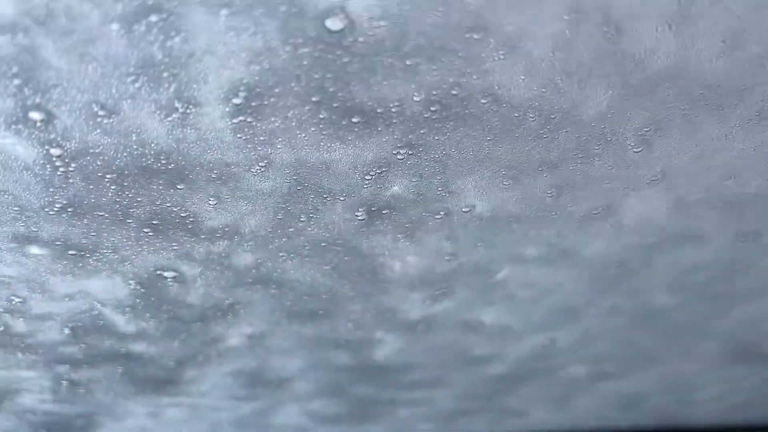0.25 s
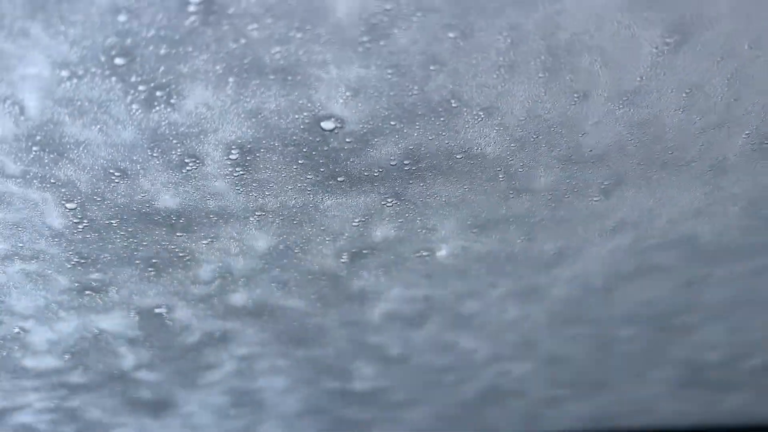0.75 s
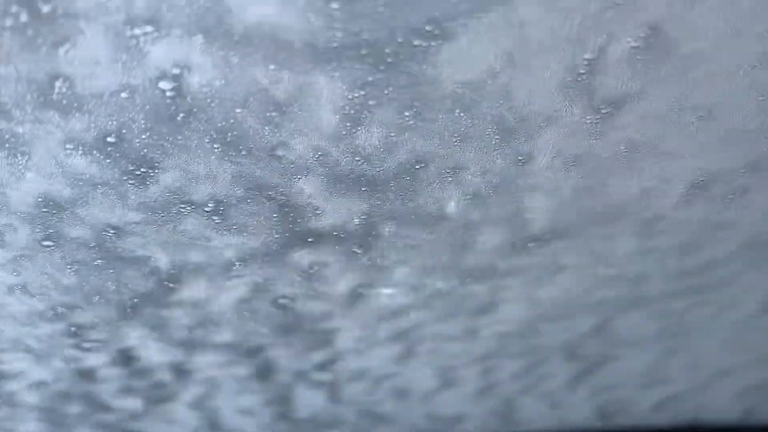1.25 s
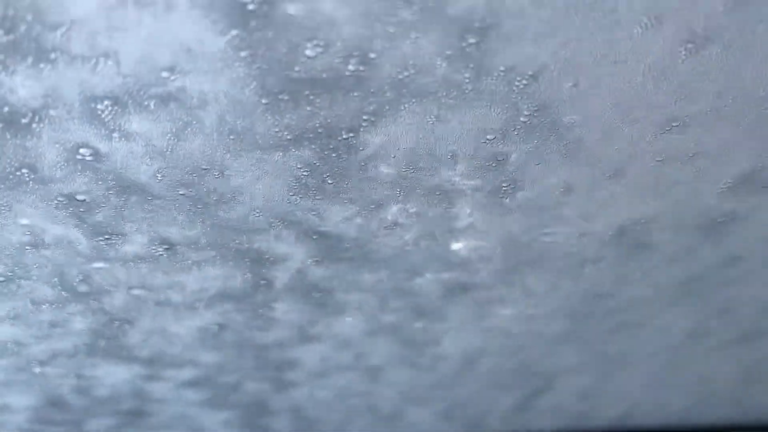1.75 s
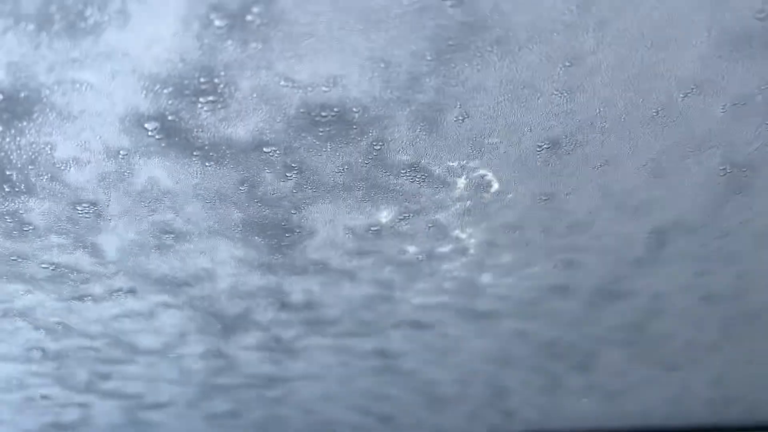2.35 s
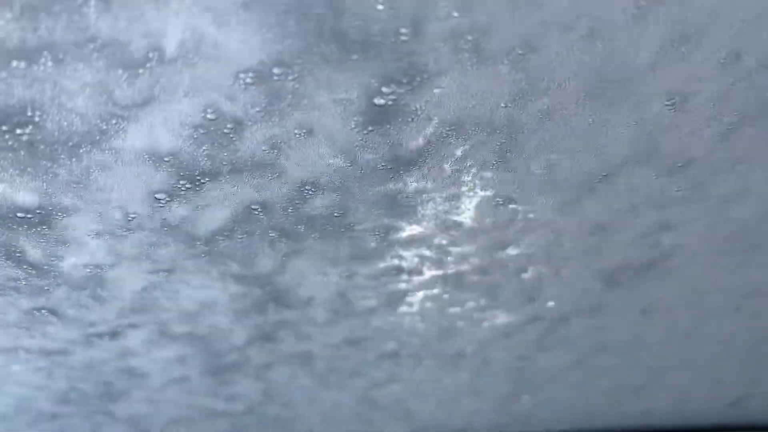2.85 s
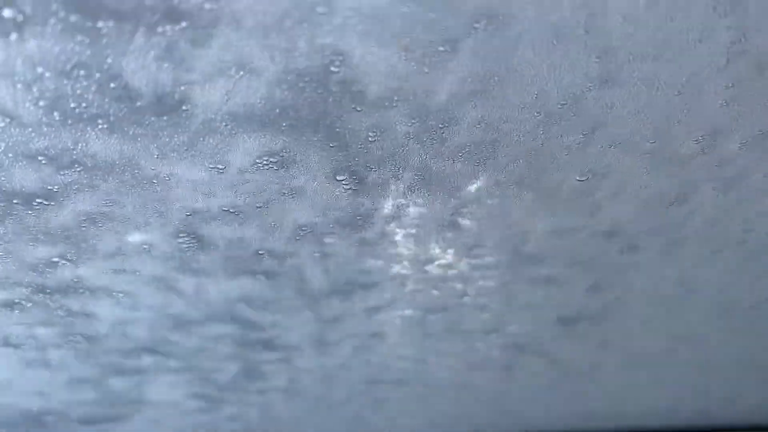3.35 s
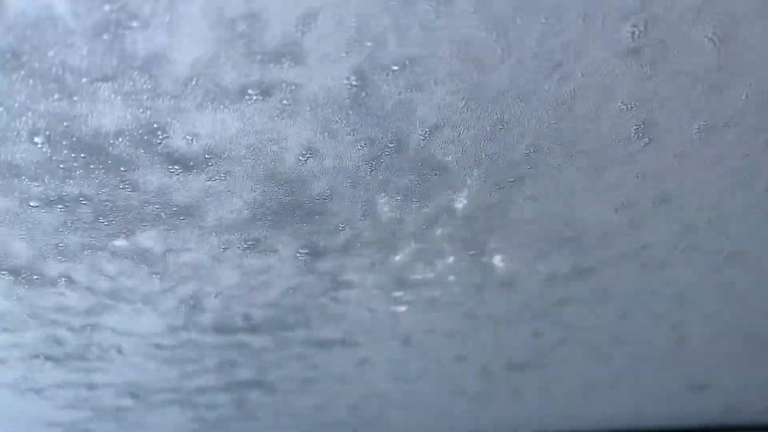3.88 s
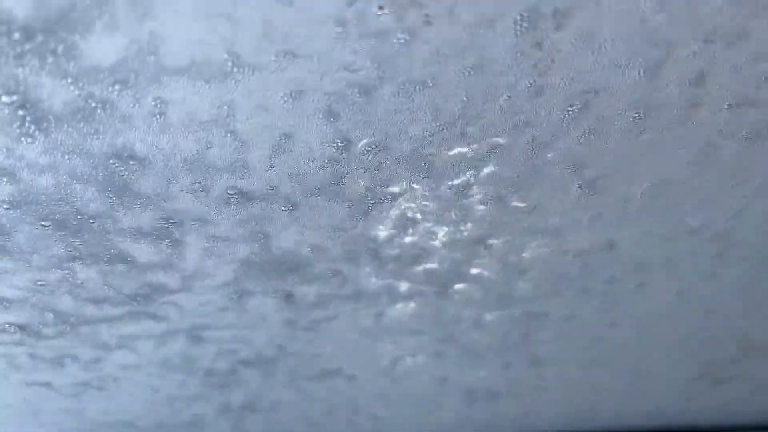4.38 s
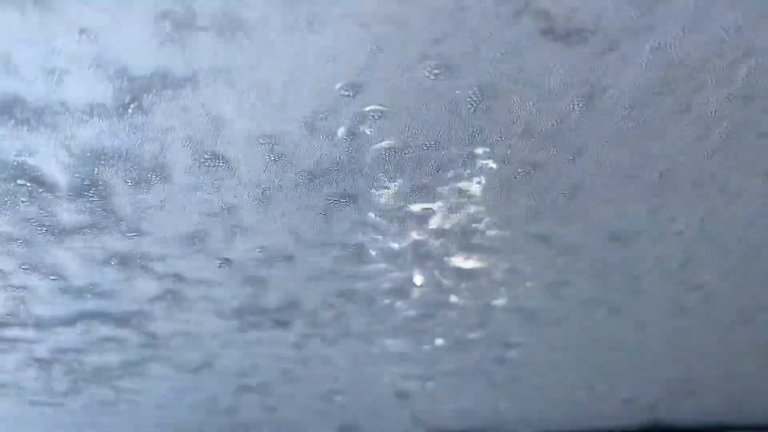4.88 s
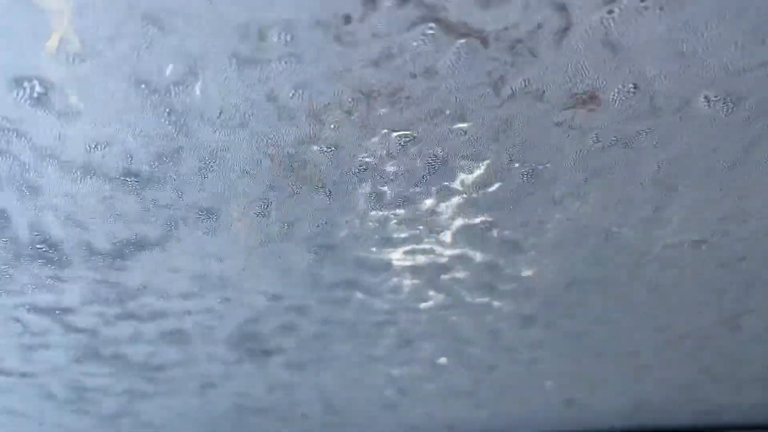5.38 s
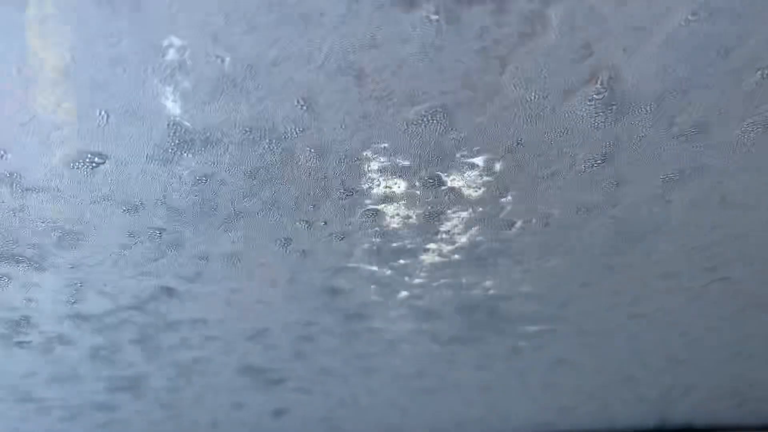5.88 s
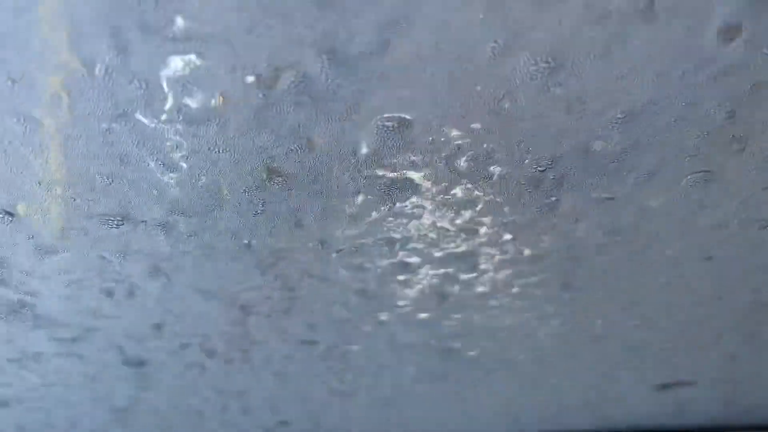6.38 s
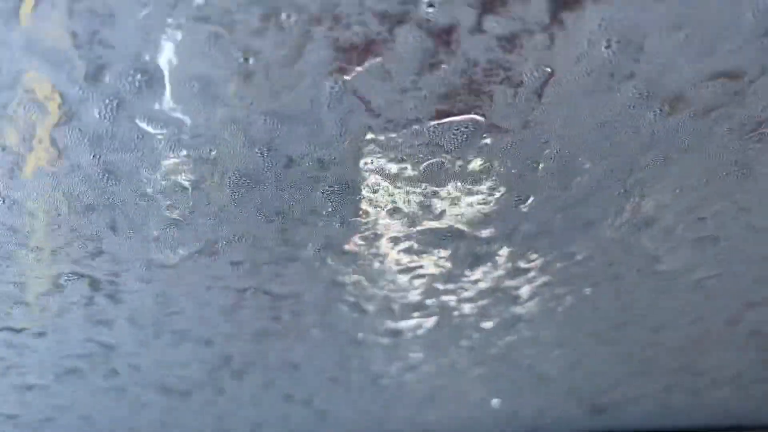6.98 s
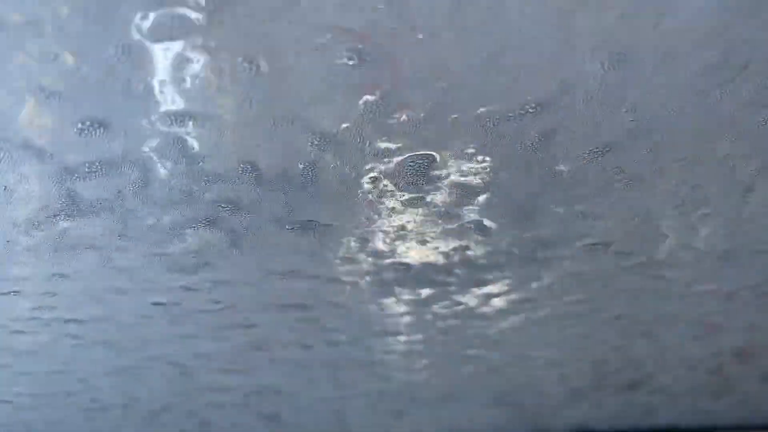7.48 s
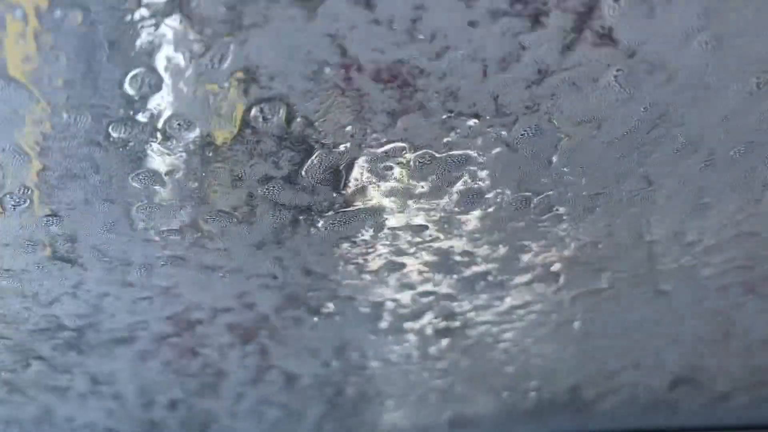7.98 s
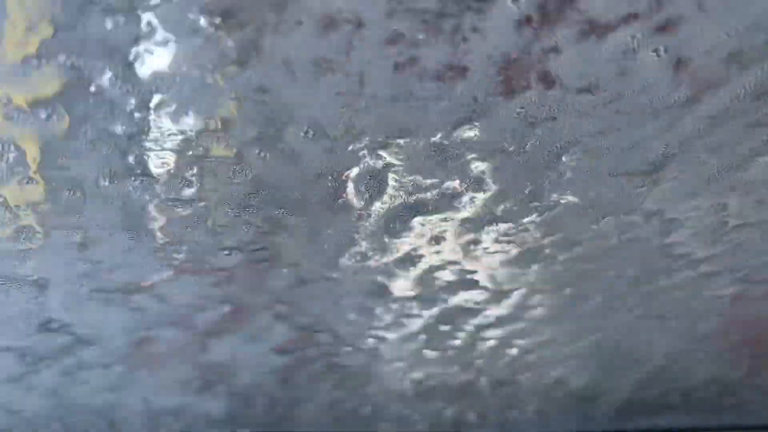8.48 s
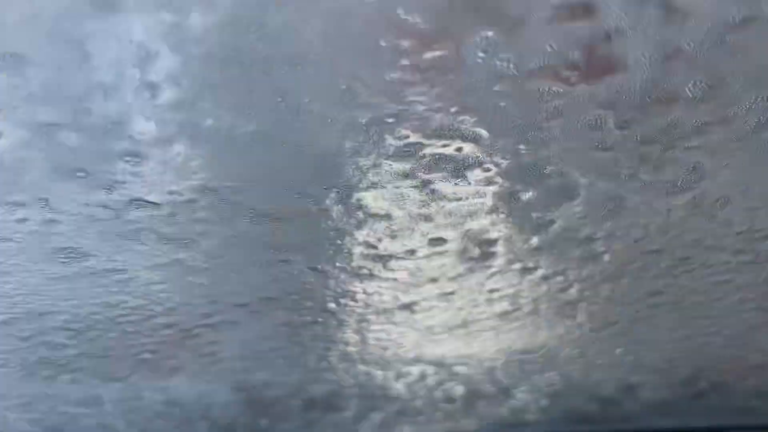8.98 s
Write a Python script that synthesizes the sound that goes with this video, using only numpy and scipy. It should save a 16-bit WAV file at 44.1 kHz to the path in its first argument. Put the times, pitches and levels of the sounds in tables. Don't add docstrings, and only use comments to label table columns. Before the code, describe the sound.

A muffled car interior during a high-pressure wash. Soft bass rumble, door splashes and scattered slaps come first, with short thin pump tones. From about three seconds the rotating jets surge nearer, fluttering the hiss and thumping the sheet metal. After seven seconds the roof and panels drone powerfully to the end, with fine spray, drops and occasional hard taps. The microphone sits inside the cabin.

```python
import sys
import numpy as np
from scipy import signal
from scipy.fft import rfft, irfft, next_fast_len
from scipy.io import wavfile
from scipy.ndimage import uniform_filter1d

SR = 44100
rng = np.random.default_rng(int(sys.argv[2]) if len(sys.argv) > 2 else 0)


def store_pcm(level_fs):
    pcm = np.round(np.clip(level_fs, -1, 1) * 32767).astype(np.int16)
    wavfile.write(sys.argv[1], SR, np.atleast_2d(pcm).T)


def decibels_to_gain(level_db):
    exponent = np.asarray(level_db, float) / 20
    return 10 ** exponent


N = 407484
STEP = 30
TIME = np.arange(N // STEP + 2) * STEP / SR

# (time [s], level [dB])
ROOF_FORCE = [(0, -27), (1.75, -30), (1.9, -24), (2.05, -30), (3.25, -30), (3.4, -21.5), (4.1, -17.5),
              (4.3, -24.5), (4.45, -19), (5.1, -21.5), (5.45, -17.5), (5.85, -14), (6.15, -19),
              (6.6, -13.5), (7.0, -16.5), (7.15, -11.5), (9.24, -11.5)]
# (time [s], level [dB])
GLASS_FORCE = [(0, -46), (1.5, -47), (3.1, -44.5), (3.35, -45.5), (3.55, -42.5), (4.2, -40.5), (4.6, -39),
               (5.0, -38.5), (5.4, -35.5), (6.5, -33), (6.65, -37), (7.1, -34.5), (7.77, -37),
               (8.08, -35.5), (8.6, -36), (8.9, -33), (9.05, -36), (9.24, -34)]
ROOF_REF_DB, GLASS_REF_DB = -20, -40
# (level at both references [dB], roof slope [dB/dB], glass slope [dB/dB])
PANEL_LAW = (-22, 0.54, 0.35)
SPLASH_LAW = (-30, -0.047, 0.72)
GLASS_RING_LAW = (1.05, -0.33, 0.032)

SLOW_HZ, FAST_HZ = 28.91, 37.24
# (slow spin multiple, fast spin multiple, level [dB], wobble width [Hz])
ROOF_LINES = [(2, 0, -12, 1.2), (1, 1, -6, 1.3), (0, 2, -2, 1.1), (0, 1, -20, 1.5), (3, 0, -17, 2)]
# (slow spin multiple, fast spin multiple, level [dB], wobble width [Hz])
PANEL_LINES = [(0, 3, -8, 3), (4, 0, -11, 2), (5, 0, -9, 2.5), (0, 4, -10, 2.5), (6, 0, -15, 3),
               (0, 5, -15, 3), (0, 6, -19, 3)]
# (frequency [Hz], width [Hz], level [dB])
ROOF_MODES = [(70, 14, -2.5), (58, 10, -11)]
# (frequency [Hz], width [Hz], level [dB])
PANEL_MODES = [(113, 14.4, -4), (144.3, 15.4, -5), (180.5, 21, -9), (94.6, 41, -6.5), (213.5, 33, -15)]
PANEL_LINES_MIN = 0.71
# (middle [s], half length [s], note [Hz], swell [dB])
NOTE_SWELLS = [(0.598, 0.33, 113, 6), (1.1, 0.23, 185, -1), (1.353, 0.11, 144, 9), (1.95, .15, 64, -2),
               (2.0, .45, 115, 3), (2.4, .25, 62, 4), (2.805, 0.067, 146, 5.5), (3.25, 0.16, 139, 4.5),
               (3.4, .15, 64, 4), (3.45, 0.067, 113, 8), (3.95, .25, 75, 2), (4.0, .15, 113, 3.5),
               (4.4, 0.16, 146, 3.5), (4.45, .15, 66, 2.5), (4.7, .35, 76.6, -3), (4.85, .15, 150, 3),
               (4.9, 0.16, 186, 2.5), (5.2, 0.33, 67.5, 3.5), (5.5, .2, 180, 2), (5.603, 0.12, 147, -4),
               (5.804, 0.19, 74.6, 0), (6.3, 0.19, 113, 2), (6.4, 0.1, 188, 8.5), (6.5, 0.28, 76.4, 1.5),
               (6.6, 0.18, 146, 1), (7.15, 0.13, 186, 2.5), (7.3, .3, 58, -6), (7.903, 0.16, 114, 4.5),
               (7.8, .15, 146, 4), (8.15, 0.11, 223, 5), (8.3, 0.28, 145, 0.5), (8.8, .15, 37.3, 2.5),
               (9.052, 0.16, 110, 1)]
# (middle [s], half length [s], splash [dB], panel boom [dB])
DOOR_SWELLS = [(.15, 0.12, -1.5, -1.5), (0.505, 0.13, -2, -3.5), (.7, 0.049, 0, 0), (1.33, 0.05, -1, 3),
               (1.553, 0.045, -1.5, 3), (2.837, 0.041, 2, 2), (3.2, 0.079, -0.5, 1.5), (4, 0.16, 2, -1.5),
               (4.396, 0.066, 1.5, 1.5), (4.7, 0.23, 2.5, 3.5), (5.21, 0.05, -1, 1), (5.444, 0.19, 2, 2),
               (5.698, 0.12, 2, 0), (5.9, 0.17, 1.5, -3.5), (6.216, 0.089, 1, 2.5), (6.452, 0.12, 0, -3),
               (7.402, 0.11, 1.5, -2.5), (7.943, 0.23, 1, 0), (9.1, 0.066, -0.5, -2.5)]

# (middle [s], half length [s], slow nozzle throb [dB], fast nozzle throb [dB])
GLASS_FACING = [
    (0.2, 0.2, 1.5, -1.5),
    (3.152, 1, 2, 1.5),
    (5.594, 0.27, -3.5, -1),
    (6.898, 0.87, 2.2, 1.6),
    (7.813, 0.25, -0.5, -4),
    (8.843, 0.4, 0.2, 0),
]
# (time [s], swell [dB])
GLASS_SLAPS = [(0.912, 7), (1.179, 2), (1.88, 3), (2.536, 7), (2.673, 3), (2.745, 3), (2.887, 3),
               (3.127, 2), (3.445, 1), (3.546, 5), (3.791, -4), (4.315, 1), (4.377, 1), (4.54, 4),
               (5.589, 4), (6.275, 4), (6.57, 9), (6.818, -2), (6.95, 0), (7.751, -2), (2.782, 5),
               (2.989, 3), (3.161, 6), (3.231, 10), (3.687, 6), (3.896, 3), (4.102, 3), (4.481, 0),
               (5.039, -8), (5.066, 7), (5.179, 2), (5.411, 5), (5.695, 0), (6.005, 2), (6.202, 7),
               (6.238, 9.5), (6.359, 6), (6.438, 7.5), (6.479, 6), (6.522, 6.5), (6.606, 2), (6.647, 7),
               (6.73, 8), (6.85, 6), (7.088, 6.5), (7.124, 8), (7.277, 1), (7.858, 1), (8.685, 3),
               (8.703, -17), (8.719, 7), (8.752, -4), (8.79, 0), (8.827, 0), (9.067, -1), (9.112, 1)]
STRAY_SLAPS_PER_S, STRAY_MAX_DB = 8.8, 2.5

# (frequency [Hz], density [dB per Hz])
SPLASH_SPECTRUM = [(110, -29), (190, -8), (210, -12.5), (236, -3.5), (345, -5), (634, -17), (910, -22.5),
                   (1060, -36.5), (1150, -29.5), (1500, -29), (2530, -120)]
# (frequency [Hz], density [dB per Hz])
HISS_SPECTRUM = [(590, -30), (1000, -6), (1060, 0.5), (1230, -1.5), (1430, -7), (1830, -1.5), (2510, -5),
                 (3040, -5), (4750, -11), (6570, -13.5), (8100, -16.5), (10500, -41), (17800, -120)]
DOOR_RING_HZ, GLASS_RING_HZ = 820, 3480
# (middle [s], half length [s], door [dB], low ring [dB], top [dB])
TINTS = [(0.102, .15, 6.5, -1, 1), (0.49, 0.11, 4.5, -3, 1), (.8, 0.18, 1, 0, 0.5),
         (1.25, 0.23, 1.5, -1, 1), (2.0, 0.48, 0, 1, 1), (2.7, 0.12, 0, 2, 0.5), (3.0, .2, 0, 2, 1.5),
         (5.45, .07, 1, -0.5, 1.5), (8.85, 0.05, 1, 0, 0), (3.403, 0.16, 4, 2, -0.5),
         (3.897, 0.21, 3, 4, 1.5), (4.603, 0.24, 2, 4.5, 2), (5.2, 0.15, 1.5, 2.5, 2.5),
         (5.6, 0.22, 0.5, 1, 0), (5.95, 0.12, -3.5, 0, 1), (6.9, 0.23, 0, -1, 0), (7.302, 0.29, -1, 0, 1),
         (7.7, 0.28, -1.5, -1, -0.5), (8.45, 0.61, -3.5, -2.5, 1), (8.912, 0.15, -5, -1.5, 1.5),
         (9.15, 0.065, -5, -1, 5)]
# (door [Hz], low ring [Hz], top [Hz])
TINT_HZ = (270, 2000, 5200)
DOOR_MODE_HZ, DOOR_MODE_WIDTH_HZ, DOOR_MODE_DB = 905, 25, -3
DROPS_PER_S, DROPS_DB = 300, -6.5

# (low [Hz], high [Hz], level [dB], extra loss while jets are far [dB/dB])
MIST_BANDS = [(6800, 7600, -10, 5), (7490, 9190, -1, 0.3), (9200, 10450, 2.5, 0.76),
              (10300, 11100, -5, 0.7), (11100, 12600, -7.5, 0.5), (12600, 13250, -21, 4),
              (13250, 14550, -12.5, .45), (14850, 15850, -7.5, 0.4)]
MIST_DB, MIST_PER_ROOF_DB = -9, 0.081
IN_STEP_HZ, TURN_HZ = 8414, 3660
MIST_GATE_LOW_HZ, MIST_GATE_HIGH_HZ, MIST_GATE_FROM_DB = 11050, 13200, -44.8
GAP_BURST_DB = 5.5
LOOSE_DB, LOOSE_BURST_DB = -17.5, 4.5

# (time [s], frequency [Hz], peak [dB], t60 [s])
WATER_KNOCKS = [
    (.284, 5600, -33, .008),
    (.284, 7600, -39, .008),
    (.885, 252, -17, 0.18),
    (1.27, 263, -20.5, 0.2),
    (1.879, 890, -24, 0.022),
    (8.722, 790, -19, .025),
    (9.066, 1160, -22, 0.058),
    (5.42, 1260, -26, .05),
]
# (start [s], length [s], level [dB], frequency [Hz])
PUMP_WHINES = [
    (0.965, 0.12, -40.5, 330.6),
    (1.17, 0.15, -33, 333),
    (1.496, 0.098, -55, 333),
    (1.708, 0.18, -35, 334.4),
    (1.976, 0.2, -33.5, 339.6),
    (2.39, 0.063, -40.5, 332.8),
    (4.4, 0.28, -29.5, 337.7),
    (8.994, 0.21, -37, 342),
]
WHINE_FADE_DB_PER_S = 153
WHINE_UNDER, WHINE_UNDER_DB = 8 / 9, -7.5
WHINE_OVER, WHINE_OVER_DB = 10 / 9, -14
IDLE_HZ, IDLE_DB = 45.4, -26.5
# (frequency [Hz], width [Hz], level [dB])
SHAKE_MODES = [(33, 5.2, -37), (38.3, 6.9, -36), (48.7, 19, -36)]

# (frequency [Hz], side minus mid [dB])
STEREO_WIDTH = [(60, -13), (110, -19), (200, -11), (380, -6), (700, 2), (1290, 5.5), (2380, -5.5),
                (4400, -2), (8120, -7), (15000, -3)]
# (frequency [Hz], left minus right [dB])
STEREO_LEAN = [(60, 0.5), (110, 1), (200, 3), (380, 1.5), (700, 2), (1290, 2.5), (2380, 4), (4400, 4.5),
               (8120, 6), (15000, 0.0)]
# (left delay [ms], right delay [ms], level [dB])
REFLECTIONS = [(5.9, 5.3, -19), (13.7, 11.3, -18), (19.1, 22.3, -18), (29.3, 26.9, -19)]
MIST_ECHO_DB = -7
SCATTERED_TOP_HZ = 9200
CUTOFF_HZ = 16300


def spins():
    return [phase_of(hz * (1 + 0.00382 * drift(0.584))) for hz in (SLOW_HZ, FAST_HZ)]


def roof_and_panels(roof_db, panel_db, slow, fast):
    overhead_db = uniform_filter1d(roof_db, size=1500)
    close = np.clip((overhead_db + 28.7) / 13.0, 0.15, 1)
    noise_share = 1.6 - close
    roof = close * drone(ROOF_LINES, slow, fast) + noise_share * ringing(ROOF_MODES)
    panel_share = np.maximum(close, PANEL_LINES_MIN)
    panels = panel_share * drone(PANEL_LINES, slow, fast) + noise_share * ringing(PANEL_MODES)
    return decibels_to_gain(roof_db) * roof + decibels_to_gain(panel_db) * panels


def drone(lines, slow, fast):
    out = 0
    for m, n, level_db, width_hz in lines:
        hz = m * SLOW_HZ + n * FAST_HZ
        phase = m * slow + n * fast + 0.7 * drift(width_hz)
        size = decibels_to_gain(level_db + 1.57 * drift(width_hz) + note_swell(hz)) * np.sqrt(2)
        side = np.cos(phase + 0.21 * drift(width_hz))
        out = out + size * spread(np.sin(phase), side, hz)
    return out


def ringing(modes):
    out = 0
    for hz, width_hz, level_db in modes:
        r = np.exp(-np.pi * 1.5 * width_hz * STEP / SR)
        stage = [1, 0, -1, 1, -2 * r * np.cos(2 * np.pi * hz * STEP / SR), r * r]
        white = rng.standard_normal((2, 2 * len(TIME)))
        settled = signal.sosfilt([stage, stage], white)[:, len(TIME):]
        mid, side = rms_one(settled)
        out = out + decibels_to_gain(level_db + note_swell(hz)) * spread(mid, side, hz)
    return out


def note_swell(hz):
    near = [row for row in NOTE_SWELLS if abs(np.log(hz / row[2])) < 0.2]
    middle, half, note_hz, swell_db = np.transpose(near + [(0, 1, hz, 0)])
    match = np.exp(-(np.log(hz / note_hz) / 0.07) ** 2)
    return swell_db * match @ bumps(middle, half)


def throb(slow, fast):
    slow_db, fast_db = swells(GLASS_FACING)
    turns_db = slow_db * (np.sin(slow) + 0.5 * np.sin(2 * slow + 0.25))
    turns_db = turns_db + fast_db * (np.sin(fast) + 0.34 * np.sin(2 * fast + 0.48))
    t = TIME[:90]
    slap = (1 - np.exp(-t / 0.0006)) * np.exp(-t / 0.012)
    is_stray = rng.random(len(TIME)) < STRAY_SLAPS_PER_S * STEP / SR
    hits_db = STRAY_MAX_DB * rng.random(len(TIME)) * is_stray
    for s, swell_db in GLASS_SLAPS:
        hits_db[round(s * SR / STEP)] = swell_db
    return turns_db + np.convolve(hits_db, slap)[:len(TIME)] + 0.19 * drift(38.0)


def spray(spectrum, count, level_db, ring_hz, ring_db, patchy_db, tint_db):
    edges = np.geomspace(spectrum[1][0], spectrum[-3][0], count + 1)
    white = rng.standard_normal((2, 2, N))
    out, power = 0, 0
    for k, (low_hz, high_hz) in enumerate(zip(edges, edges[1:])):
        sos = signal.butter(2, [low_hz, high_hz], "band", fs=SR, output="sos")
        mid, side = signal.sosfilt(sos, white[k % 2])
        hz = np.sqrt(low_hz * high_hz)
        density_db = at_hz(spectrum, hz)
        near_ring = np.exp(-(np.log2(hz / ring_hz) / 0.16) ** 2)
        band_tint_db = np.exp(-(np.log2(hz / np.array(TINT_HZ)) / 0.7) ** 2) @ tint_db
        flicker_db = patchy_db * (drift(27.0) + 0.77 * drift(1.43))
        gain = decibels_to_gain(density_db + level_db + near_ring * ring_db + band_tint_db + flicker_db)
        out = out + fine(gain) * spread(mid, side, hz)
        power += decibels_to_gain(2 * density_db) * np.mean(mid ** 2)
    return out / np.sqrt(power)


def door_line(splash):
    r = np.exp(-np.pi * DOOR_MODE_WIDTH_HZ / SR)
    zeros = [(1 - r * r) / 2, 0, (r * r - 1) / 2]
    poles = [1, -2 * r * np.cos(2 * np.pi * DOOR_MODE_HZ / SR), r * r]
    return decibels_to_gain(DOOR_MODE_DB) * signal.lfilter(zeros, poles, splash)


def mist(hiss_db, throb_db):
    white, near = rng.standard_normal((2, N)), 0
    far_db = np.minimum(hiss_db + 36, 0)
    for k, (low_hz, high_hz, level_db, growth) in enumerate(MIST_BANDS):
        sos = signal.butter(5, [low_hz, high_hz], "band", fs=SR, output="sos")
        band = rms_one(signal.sosfilt(sos, white[k % 2]))
        burst_db = (level_db < -14) * GAP_BURST_DB * drift(6.5)
        near = near + fine(decibels_to_gain(level_db + growth * far_db + 1.05 * drift(32.0) + burst_db)) * band
    size = next_fast_len(N)
    hz = np.fft.rfftfreq(size, 1 / SR)
    in_gate = (hz > MIST_GATE_LOW_HZ) * (hz < MIST_GATE_HIGH_HZ)
    gated = irfft(rfft(near, size) * in_gate, size)[:N]
    removed = np.clip((MIST_GATE_FROM_DB - hiss_db) / 0.7 + 0.6 + 1.2 * drift(14), 0, 1)
    near = near - gated * fine(removed)
    turn = np.pi * (hz - IN_STEP_HZ) / TURN_HZ
    turn -= 0.65 * np.sin(4 * turn) / 4
    ports = irfft(rfft(near, size) * np.exp([-1j * turn, 1j * turn]), size)[:, :N]
    loose = np.array([np.roll(near, 900), np.roll(near, 1700)])
    ports = ports + fine(decibels_to_gain(LOOSE_DB + LOOSE_BURST_DB * drift(13.0))) * loose
    return fine(decibels_to_gain(hiss_db + MIST_DB + 0.74 * throb_db)) * ports


def drops(level_db):
    sizes = decibels_to_gain(1.2 * np.minimum(rng.exponential(1, N), 3.3)) * rng.choice([-1, 1], N)
    born = rng.random(N) < fine(DROPS_PER_S * decibels_to_gain(4.0 * drift(5.0))) / SR
    spot, out = rng.integers(0, 12, N), np.zeros((2, N))
    for k, hz in enumerate(np.geomspace(1300, 4600, 12)):
        r = decibels_to_gain(-60 * hz / (24.0 * SR))
        w = 2 * np.pi * hz / SR
        strikes = sizes * born * (spot == k) + 1e-18
        out[k % 2] += signal.lfilter([0, np.sin(w)], [1, -2 * r * np.cos(w), r * r], strikes)
    return fine(decibels_to_gain(level_db)) * rms_one(out + 0.19 * out[::-1])


def knocks():
    out, t = np.zeros(N + SR), np.arange(SR // 4) / SR
    for s, hz, peak_db, t60_s in WATER_KNOCKS:
        onset = np.minimum(hz * t / 2, 1)
        knock = decibels_to_gain(peak_db - 60 * t / t60_s) * np.sin(2 * np.pi * hz * t) * onset
        out[round(s * SR):][:len(t)] += knock
    return out[:N]


def whine():
    s, length, level_db, hz = np.transpose(PUMP_WHINES)
    early, late = s - TIME[:, None], TIME[:, None] - s - length
    outside_s = np.maximum(np.maximum(early, late), 0)
    size = decibels_to_gain(level_db - WHINE_FADE_DB_PER_S * outside_s).sum(axis=1) * decibels_to_gain(1.1 * drift(9.9))
    phase = phase_of(np.interp(TIME, s + length / 2, hz) + 3 * drift(14))
    under = decibels_to_gain(WHINE_UNDER_DB) * np.sin(WHINE_UNDER * phase)
    over = decibels_to_gain(WHINE_OVER_DB) * np.sin(WHINE_OVER * phase)
    return size * np.sqrt(2) * (np.sin(phase) + under + over)


def engine():
    line = decibels_to_gain(IDLE_DB + 0.71 * drift(5.2)) * np.sin(phase_of(IDLE_HZ + 0.388 * drift(0.71)))
    return np.sqrt(2) * line + ringing(SHAKE_MODES)


def cabin(x, extra_db):
    out = x.copy()
    for k, (*delays_ms, level_db) in enumerate(REFLECTIONS):
        for side in (0, 1):
            delayed = np.roll(x[side], round(delays_ms[side] * SR / 1000))
            out[side] += (-1) ** k * decibels_to_gain(level_db + extra_db) * delayed
    return out / np.sqrt(1 + sum(decibels_to_gain(2 * (row[2] + extra_db)) for row in REFLECTIONS))


def spread(mid, side, hz):
    lean_db = at_hz(STEREO_LEAN, hz) / 2
    both = mid + decibels_to_gain(at_hz(STEREO_WIDTH, hz)) * side * [[1], [-1]]
    return both * decibels_to_gain(np.array([[lean_db], [-lean_db]]))


def follow(law, roof_db, hiss_db):
    base_db, per_roof, per_glass = law
    return base_db + per_roof * (roof_db - ROOF_REF_DB) + per_glass * (hiss_db - GLASS_REF_DB)


def bumps(middle, half):
    return np.exp(-((TIME - middle[:, None]) / half[:, None]) ** 2)


def swells(rows):
    middle, half, *levels_db = np.transpose(rows)
    return np.array(levels_db) @ bumps(middle, half)


def drift(rate_hz):
    r = np.exp(-2 * np.pi * rate_hz * STEP / SR)
    white = rng.standard_normal(len(TIME) + 5000)
    return rms_one(signal.lfilter([1], [1, -2 * r, r * r], white)[5000:])


def in_time(rows):
    s, level_db = np.transpose(rows)
    return np.interp(TIME, s, level_db)


def at_hz(points, hz):
    table_hz, level_db = np.transpose(points)
    return np.interp(np.log(hz), np.log(table_hz), level_db)


def fine(control):
    return np.interp(np.arange(N) / STEP, np.arange(len(TIME)), control)


def phase_of(hz):
    return 2 * np.pi * np.cumsum(hz) * STEP / SR


def rms_one(x):
    return x / np.sqrt(np.mean(x ** 2) + 1e-20)


def scene():
    roof_db, hiss_db = in_time(ROOF_FORCE), in_time(GLASS_FORCE)
    door_splash_db, door_panel_db = swells(DOOR_SWELLS)
    panel_db = follow(PANEL_LAW, roof_db, hiss_db) + door_panel_db
    splash_db = follow(SPLASH_LAW, roof_db, hiss_db) + door_splash_db
    glass_db = follow(GLASS_RING_LAW, roof_db, hiss_db)
    door_db = 3.5 + 0.086 * (hiss_db + 34.5)
    tint_db = swells(TINTS)
    slow, fast = spins()
    throb_db = throb(slow, fast)

    low = roof_and_panels(roof_db, panel_db, slow, fast) + engine() + whine()
    bass = signal.resample_poly(low, STEP, 1, axis=1)[:, :N]
    splash = spray(SPLASH_SPECTRUM, count=11, level_db=splash_db + 0.81 + 0.54 * throb_db,
                   ring_hz=DOOR_RING_HZ, ring_db=door_db, patchy_db=1.0, tint_db=tint_db)
    hiss = spray(HISS_SPECTRUM, count=10, level_db=hiss_db - 0.89 + throb_db,
                 ring_hz=GLASS_RING_HZ, ring_db=glass_db, patchy_db=1.18, tint_db=tint_db)
    scattered = splash + door_line(splash) + hiss + drops(hiss_db + DROPS_DB + glass_db)
    muffled = signal.sosfilt(signal.butter(12, SCATTERED_TOP_HZ, fs=SR, output="sos"), scattered)
    top = mist(hiss_db, throb_db + MIST_PER_ROOF_DB * (roof_db - ROOF_REF_DB))
    return bass + cabin(muffled + knocks(), 0) + cabin(top, MIST_ECHO_DB)


def band_limit(x):
    return signal.sosfilt(signal.butter(12, 17110, fs=SR, output="sos"), x)


def record(dry):
    rounded = 1.05 * np.tanh(dry / 1.05)
    cut = signal.sosfilt(signal.cheby2(12, 70, CUTOFF_HZ, fs=SR, output="sos"), rounded)
    return band_limit(cut)


dry = scene()
out = record(dry)
store_pcm(out)
```